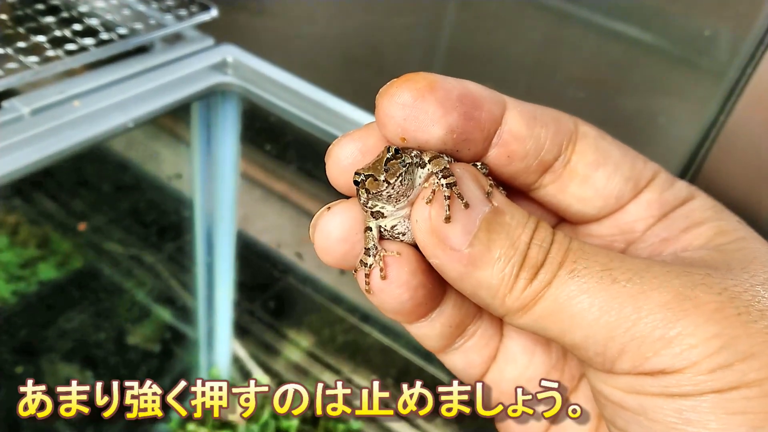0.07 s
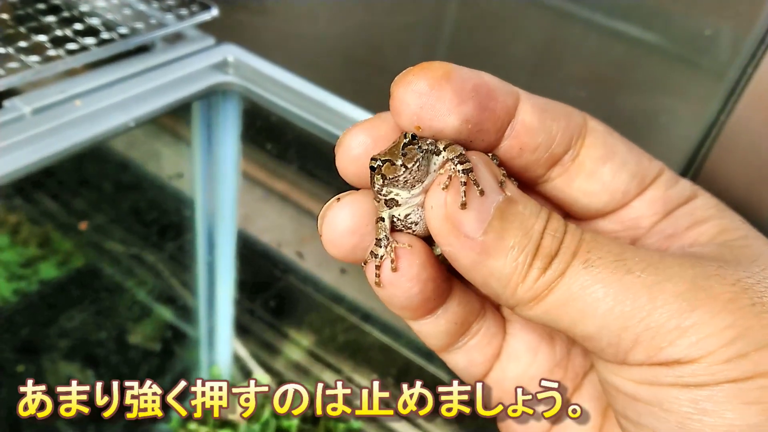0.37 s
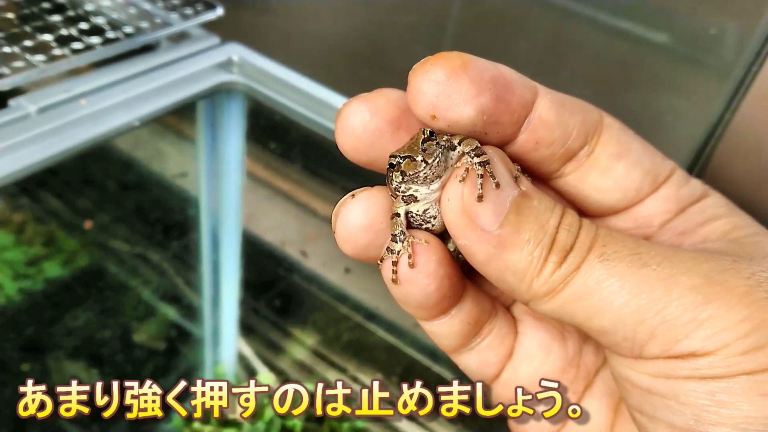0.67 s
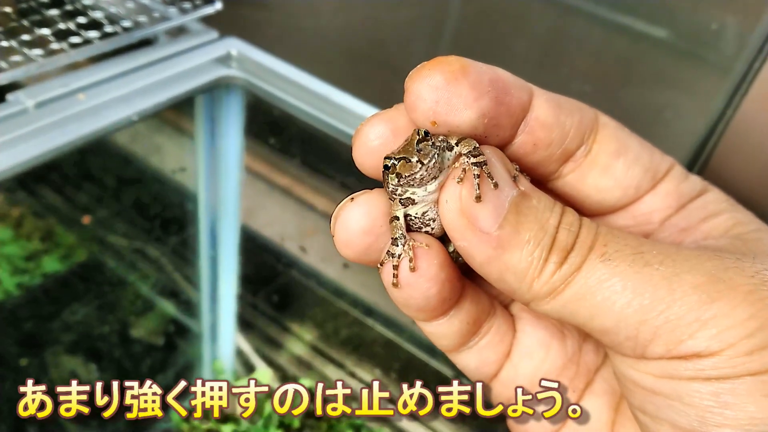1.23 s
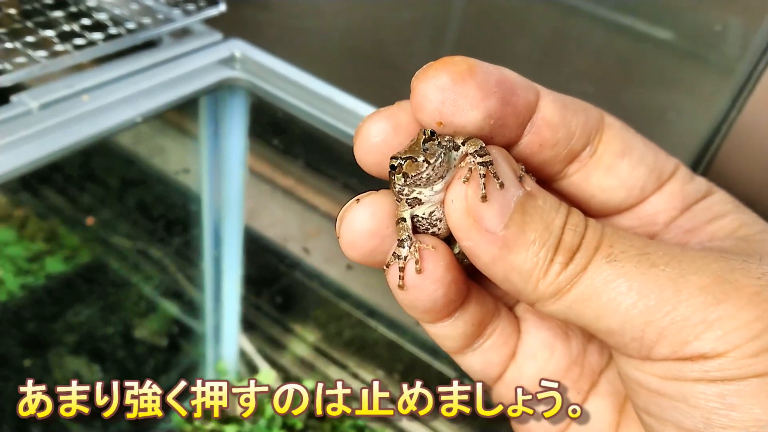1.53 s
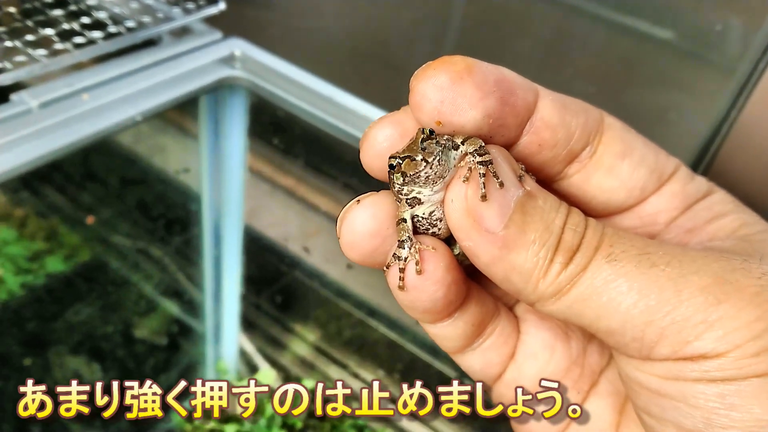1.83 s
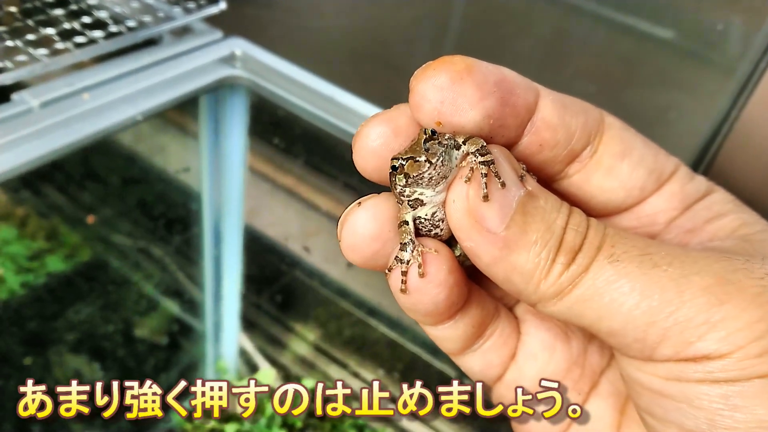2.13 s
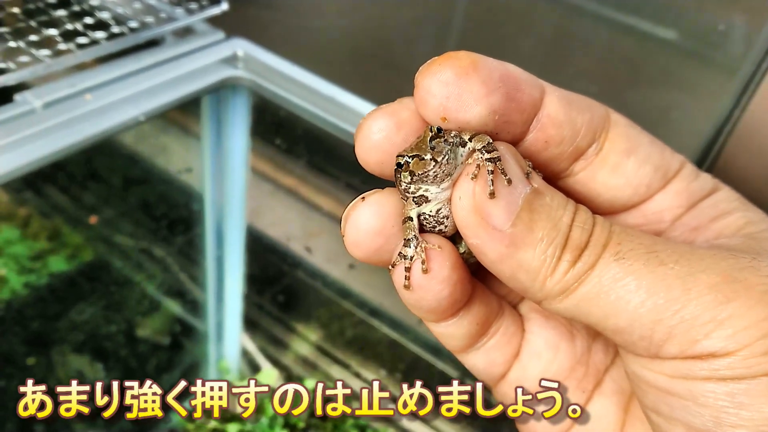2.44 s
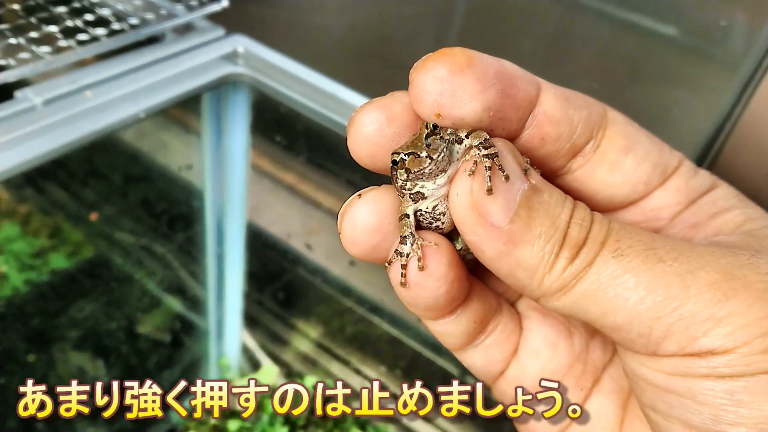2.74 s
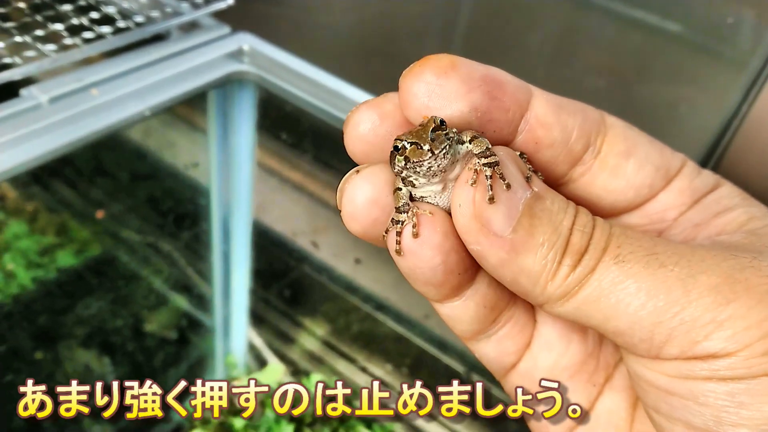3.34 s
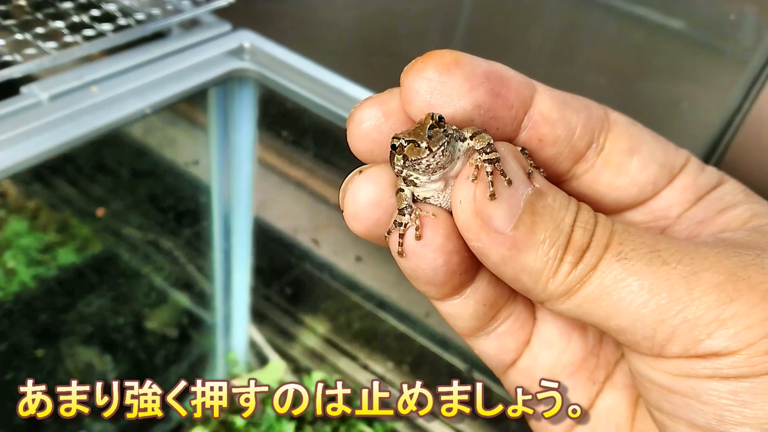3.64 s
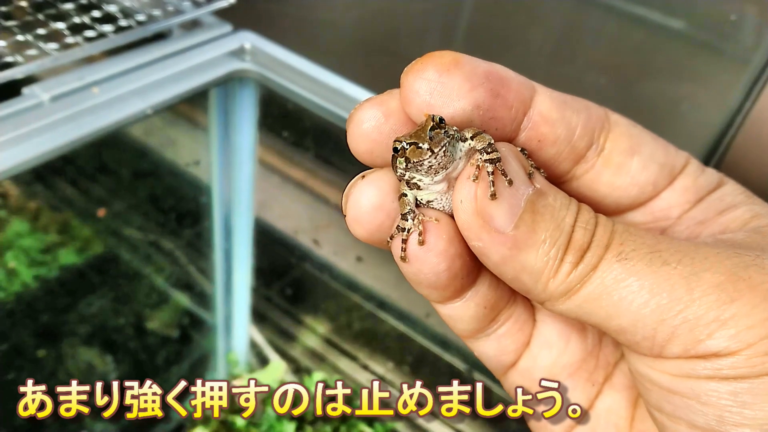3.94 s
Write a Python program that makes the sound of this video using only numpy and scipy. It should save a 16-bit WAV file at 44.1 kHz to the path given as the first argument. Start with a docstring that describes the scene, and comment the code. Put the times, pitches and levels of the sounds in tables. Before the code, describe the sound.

A small hand-held frog gives about nine brief calls close to the microphone: first three creaks, then loose clicks, often ending in tiny peeps, and one higher creak. Motors hum throughout in the room over low rumble and faint hiss.

```python
"""From the start, motors hum and beat over a low rumble and faint hiss in a room with glass tanks.
At 0.6 s a small frog, held in the fingers, begins nine short release calls, often ending in a tiny
pure peep. The first three are creaks: trains of laryngeal pulses that excite throat and body resonances.
One thin tick sounds at 1.4 s. Four calls of loose clicks follow, then a higher creak at 3.4 s
and a last few clicks with a peep."""
import sys
import numpy as np
from scipy import signal
from scipy.fft import rfft, irfft
from scipy.io import wavfile

SR = 44100
rng = np.random.default_rng(int(sys.argv[2]) if len(sys.argv) > 2 else 0)


def master_out(mix):
    """Clip the mix to full scale and print it as 16-bit PCM to the path in sys.argv[1]."""
    frames = np.transpose(np.atleast_2d(mix))
    ceiling = np.clip(frames, -1, 1)
    pcm = np.round(ceiling * 32767).astype(np.int16)
    wavfile.write(sys.argv[1], SR, pcm)


N = 176400
T = np.arange(N) / SR

# motor tones: (frequency [Hz], level [dB], left minus right [dB], waver [0-1])
MOTOR_TONES = [(92.44, -47.5, 5, 0.01), (186.9, -51, -6.5, 0.51), (405, -66, 6, 0.99),
               (562, -74.5, 24, 0.77), (643.3, -66, 18, 0), (857.5, -62.5, 2.5, 0.29),
               (1073, -81.5, 15.5, 0), (1280, -84, 18, 0.07)]
# envelope of the deepest rumble: (time [s], relative level [dB])
DEEP_ENVELOPE = [(0.0, -41), (0.72, -47), (0.89, -63), (1.19, -32), (1.24, -55.5), (2.05, -47),
                 (2.08, -39.5), (2.23, -36), (2.27, -51), (2.57, -44), (2.6, -42.5), (3.51, -45),
                 (3.58, -68), (3.62, -45), (3.82, -44), (4.0, -79)]
# spectrum of rumble and hiss: (frequency [Hz], spectral density [dB re 1/Hz])
NOISE_SPECTRUM = [(22, -126), (40, -92), (58, -68.5), (78, -67), (120, -63), (170, -65), (215, -77),
                  (280, -83), (400, -82.5), (600, -85), (900, -88), (1500, -99), (2200, -103), (3400, -107),
                  (3800, -108), (4300, -103), (4700, -109), (5200, -114), (6600, -115), (8000, -109),
                  (9000, -115), (10800, -114), (12000, -123), (15500, -131)]
# likeness of that noise in the two ears: (frequency [Hz], coherence [0-1])
NOISE_COHERENCE = [(40, 0.66), (130, 0.98), (260, 1), (550, 0.11), (1200, 0.16), (3000, 0.85),
                   (12000, 0.42)]
# balance of that noise: (frequency [Hz], left minus right [dB])
NOISE_BALANCE = [(40, 12), (130, 1), (300, 5), (900, 5.5), (3000, 3.5), (12000, 2.5)]
# one curve per creak: (time [s], pulse rate [Hz], level [dB], tilt [dB/octave], period jitter [0-1])
CREAK_CURVES = [
    [(.578, 254.7, -33, 1, 0.02), (.5858, 262.4, -30, 0, 0), (.5897, 204.5, -32, 0, 0.06),
     (.6047, 184.6, -25, -1, 0.04), (.6101, 158, -26.5, -8, 0.07), (.619, 150, -23, 2, 0.02)],
    [(.925, 384.3, -31.5, 2, 0.1), (.938, 378, -27, 2, 0.05), (.950, 416.4, -26.5, 2.5, .05),
     (.960, 401.4, -26.5, -3, 0.02), (.973, 358.5, -27.5, -1, 0.09)],
    [(1.268, 315, -36, 0, 0.04), (1.2743, 346.6, -31.5, -4, 0.09), (1.283, 336.4, -26.5, 1, 0.07),
     (1.295, 331, -26, -2.5, 0), (1.302, 370, -29, -2, 0.03), (1.3115, 332, -24.5, -7, 0.11),
     (1.317, 326, -27, -1, 0.1)],
    [(3.419, 641, -35, 3, 0.09), (3.436, 641.5, -32, 6, 0.16), (3.447, 656, -27, 4, .02),
     (3.457, 696, -24, 4, 0.06), (3.467, 706, -24.5, -0.5, .01), (3.478, 651, -26, -1, 0.02),
     (3.485, 622, -25, -2, 0.04), (3.489, 636, -25, 3, 0.25), (3.496, 642.5, -28, -3, .2),
     (3.505, 664, -23.5, -1.5, 0.3)],
]
# highest treble, one value per creak: (gain [dB])
CREAK_TREBLE = [-15, 3, 4, -7]
# throat and body response: (frequency [Hz], relative left gain [dB], relative right gain [dB])
THROAT_RESPONSE = [(497, -56, -60), (1260, -23.5, -28), (1740, -19, -22), (1920, -1, -11.5),
                   (2160, -10.5, -12.5), (2680, -4.5, 0.5), (2900, -3.5, -10.5), (3310, 1.5, -4.5),
                   (3635, -4, -12), (4000, -8.5, -10), (4540, -17, -15.5), (5000, -24.5, -19.5),
                   (5830, -23.5, -31.5), (6440, -20, -20), (7000, -31, -39.5), (7600, -18, -24),
                   (8600, -27, -37.5), (11030, -25, -32), (11300, -55.5, -52), (16000, -50.5, -55)]
# single laryngeal pulses: (time [s], level [dB], tilt [dB/octave])
LOOSE_CLICKS = [(0.623, -24.5, -9), (.625, -23, -8), (.627, -26, -10), (0.6299, -24.5, -16),
                (0.9775, -24, -9), (1.626, -42, -2), (1.630, -36.5, 9), (1.636, -35, -17), (1.6476, -35, 7),
                (1.6534, -41, -13), (2.0077, -37, 5), (2.35, -38, -4), (2.3538, -37, -14),
                (2.3574, -28, -4), (2.3747, -25, -5.5), (2.3946, -26.5, -8), (2.733, -41, -10),
                (2.7406, -34, -13), (2.742, -34.5, 0), (2.747, -30.5, -12), (3.77, -35, -1),
                (3.7753, -34.5, -2), (3.7786, -31.5, -7)]
# peeps: (start [s], length [s], target pitch [Hz], upward scoop [Hz], starting level [dB], fade [dB])
PEEP_NOTES = [(.626, .012, 2370, 148, -29.5, -1), (0.98, 0.012, 2310, -4, -38, 0),
              (1.649, 0.012, 2233, 300, -38.5, -3), (2.006, 0.026, 2245, 450, -38, 3),
              (2.402, 0.012, 2390, 152, -33.5, 0), (3.504, 0.0093, 1970, 3, -32, 5),
              (3.777, 0.024, 2240, 397, -40, 0.5)]


def from_db(db):
    """Amplitude grows tenfold for every 20 dB."""
    return 10 ** (np.asarray(db) / 20)


def pan(db):
    """An interaural level difference, split evenly into left and right gains."""
    return from_db(np.array([[db / 2], [-db / 2]]))


def at_hz(points, hz):
    """Interpolation on a logarithmic frequency axis."""
    frequencies, values = np.transpose(points)
    return np.interp(np.log(hz), np.log(frequencies), values)


def drift(corner_hz):
    """Low-passed noise gives a slow random fluctuation of unit spread."""
    step, settle = 40, 2000  # samples per point; points discarded
    pole = np.exp(-2 * np.pi * step * corner_hz / SR)
    noise = rng.standard_normal(N // step + settle + 2)
    slow = signal.lfilter([1], [1, -2 * pole, pole * pole], noise)[settle:]
    return np.interp(np.arange(N) / step, np.arange(len(slow)), slow / slow.std())


def motors():
    """Motor tones waver in amplitude and phase; two close in frequency interfere to make slow beats."""
    tones = 0
    for hz, db, pan_db, waver in MOTOR_TONES:
        phasor = (1 + waver * (drift(6.4) + 1j * drift(1.54))) / np.sqrt(.5 + waver ** 2)
        tones += pan(pan_db) * from_db(db) * np.real(phasor * np.exp(2j * np.pi * hz * T))
    hum_hz, beat_period_s, beat_peak_s, beat_depth = 119.9, .68, .44, .62
    beat = 1 + beat_depth * np.exp(-2j * np.pi * (T - beat_peak_s) / beat_period_s)
    pair = np.sqrt(2) * np.real(beat * np.exp(2j * np.pi * hum_hz * T))
    return tones + pan(1.5) * from_db(-42) * pair


def deep_rumble(hz=57.55, waver_hz=5.8):
    """Random amplitude and phase modulation widen a low tone into a boom that swells and sinks."""
    level_db = np.interp(T, *np.transpose(DEEP_ENVELOPE)) - 3.5 + 2.64 * drift(waver_hz)
    phase = 2 * np.pi * hz * T + 0.98 * drift(waver_hz)
    return pan(3) * from_db(level_db) * np.sqrt(2) * np.sin(phase)


def rumble_and_hiss():
    """Stationary room noise; its coherence between the ears is greatest in the bass."""
    hz = np.maximum(np.arange(N // 2 + 1) * SR / N, 1)
    mid, side = rfft(rng.standard_normal((2, N))) * np.sqrt(SR / 2)
    coherence = at_hz(NOISE_COHERENCE, hz)
    ears = np.array([[1], [-1]])
    gain = from_db(at_hz(NOISE_SPECTRUM, hz) + ears * at_hz(NOISE_BALANCE, hz) / 2)
    noise = np.sqrt((1 + coherence) / 2) * mid + np.sqrt((1 - coherence) / 2) * side * ears
    return irfft(gain * noise, N)


def creak_pulses(shimmer_db=1.5):
    """Each opening of the larynx emits a pulse; jitter varies the period and shimmer the strength."""
    pulses = []
    for creak, treble_db in zip(CREAK_CURVES, CREAK_TREBLE):
        times, *controls = np.transpose(creak)
        time = times[0]
        for period_draw, level_draw in rng.standard_normal((90, 2)):
            if time > times[-1]:
                break
            hz, db, tilt, jitter = (np.interp(time, times, column) for column in controls)
            pulses.append((time, db + shimmer_db * level_draw, tilt, treble_db))
            time += (1 + jitter * period_draw) / hz
    return pulses


def minimum_phase(gain):
    """Of all causal responses with a given spectrum, the minimum-phase one delivers its energy soonest."""
    cepstrum = irfft(np.log(gain))
    half = cepstrum.shape[-1] // 2
    cepstrum[:, 1:half] *= 2
    cepstrum[:, half + 1:] = 0
    return irfft(np.exp(rfft(cepstrum)))


def throat(pulses, lead_s=.0004, rasp=.04, puff_decay_s=.0014):
    """Source and filter: each pulse, with its puff of air, excites the drifting throat resonances."""
    t = T[:1024]
    hz = np.maximum(np.arange(len(t) // 2 + 1) * SR / len(t), 1)
    frequencies, *ears_db = np.transpose(THROAT_RESPONSE)
    octaves = np.log2(np.clip(hz, 1920, 5400) / 3000)  # the tilt pivots about 3 kHz
    treble_shelf = np.interp(hz, [9600, 9900], [0, 1])
    wander = .019 * drift(43)  # fractional shift of the resonances
    out = np.zeros((2, N))
    for time, db, tilt, treble_db in pulses:
        start = int((time - lead_s) * SR)
        shifted = np.log(frequencies) + wander[start]
        colour_db = np.array([np.interp(np.log(hz), shifted, ear) for ear in ears_db])
        response = minimum_phase(from_db(colour_db + tilt * octaves + treble_db * treble_shelf))
        response /= np.hypot(*response).max()
        source = rasp * rng.standard_normal(len(t)) * np.exp(-t / puff_decay_s)
        source[0] = 1  # the pulse itself
        ringing = signal.fftconvolve(response, source[None], axes=1)[:, :len(t)]
        out[:, start:start + len(t)] += from_db(db) * ringing
    return out


def body_dispersion(x, hz=5510, width_hz=3700, stages=11):
    """All-pass group delay: the treble leaves the body slightly late, its strength unchanged."""
    radius = np.exp(-np.pi * width_hz / SR)
    poles = [1, -2 * radius * np.cos(2 * np.pi * hz / SR), radius * radius]
    return signal.sosfilt(np.tile(poles[::-1] + poles, (stages, 1)), x)


def delayed(x, seconds):
    """A longer path delays a wave by its extra travel time."""
    return np.interp(T - seconds, T, x, left=0)


def diffuse_tail(length_s, t60_s, gap_s=0):
    """Dense reflections add up to exponentially decaying noise, independent and of unit energy per ear."""
    t = T[:int(length_s * SR)]
    tail = rng.standard_normal((2, len(t))) * from_db(-60 * t / t60_s) * (t >= gap_s)
    return tail / np.sqrt(np.sum(tail ** 2, axis=1, keepdims=True))


def scatter(x, above_hz=3200):
    """Fingers and nearby glass scatter short wavelengths into a spray of very early reflections."""
    highpass = signal.butter(2, above_hz, "high", fs=SR, output="sos")
    spray = signal.sosfilt(highpass, diffuse_tail(length_s=.05, t60_s=.05))
    return signal.fftconvolve(x, spray, axes=1)[:, :N]


def room(x, cutoff_hz=12000):
    """Reverberation: a diffuse, slightly dull tail follows the direct sound."""
    lowpass = signal.butter(1, cutoff_hz, fs=SR, output="sos")
    tail = signal.sosfilt(lowpass, diffuse_tail(length_s=.5, t60_s=.24, gap_s=.004))
    return signal.fftconvolve(x[None], tail, axes=1)[:, :N]


def click_pulses(treble_db=-3):
    """Laryngeal pulses too few and irregular to give a pitch are heard as clicks."""
    return [(*click, treble_db) for click in LOOSE_CLICKS]


def peeps(attack_s=.0011, release_s=.004, scoop_s=.0064):
    """Free oscillation of the larynx gives a brief near sine, which mostly slides up to its pitch."""
    out = np.zeros(N)
    wobble_s = .01466 * np.cumsum(drift(138)) / SR  # the pitch strays by about 1.5 %
    for start, length, hz, scoop_hz, db, fade_db in PEEP_NOTES:
        t = np.clip(T - start, 0, length)
        envelope = np.clip(t / attack_s, 0, 1) * np.clip((length - t) / release_s, 0, 1)
        phase = 2 * np.pi * (hz * (t + wobble_s) + scoop_hz * scoop_s * np.exp(-t / scoop_s))
        tone = np.sin(phase) + from_db(-28) * np.sin(2 * phase)
        out += from_db(db - fade_db * t / length) * envelope * tone
    flutter_db = 2 * drift(250)
    return out * from_db(flutter_db) * pan(1)


def frog(hand_echo_s=.0022, right_lag_s=.00018):
    """Direct calls add to hand, glass and room reflections; a lag at the right ear places them left."""
    pulses = body_dispersion(throat(creak_pulses() + click_pulses()))
    hand_echo = from_db(-11.5) * np.array([delayed(ear, hand_echo_s) for ear in pulses])
    left, right = pulses + hand_echo + from_db(-12) * scatter(pulses) + peeps()
    reverberation = from_db(-18.5) * room((left + right) / 2)
    return np.array([left, delayed(right, right_lag_s)]) + reverberation


def tick(time_s=1.4262, hz=14400, width_hz=8100, rattle_t60_s=.079):
    """An impulse and a short rattle of noise excite one very high, heavily damped resonance."""
    t = T - time_s
    excitation = from_db(-13.5 - 60 * np.abs(t) / rattle_t60_s) * (t > 0) * rng.standard_normal(N)
    excitation[int(time_s * SR)] += 1
    radius = np.exp(-np.pi * width_hz / SR)
    poles = [1, -2 * radius * np.cos(2 * np.pi * hz / SR), radius * radius]
    return from_db(-44) * signal.lfilter([.5, 0, -.5], poles, excitation) * pan(11)


def scene():
    """Superposition: the pressures of the frog, the tick and the room's background add."""
    return frog() + tick() + motors() + deep_rumble() + rumble_and_hiss()


def record(dry, cutoff_hz=15800):
    """A steep elliptic low-pass limits the bandwidth."""
    return signal.sosfilt(signal.ellip(10, .2, 80, cutoff_hz, fs=SR, output="sos"), dry)


dry = scene()
out = record(dry)
master_out(out)
```